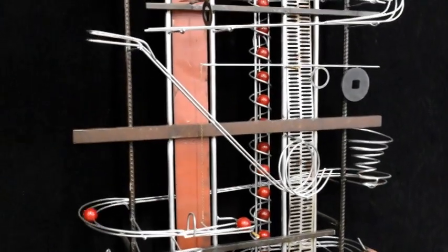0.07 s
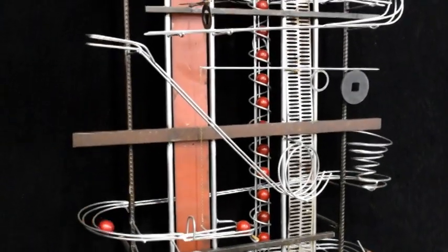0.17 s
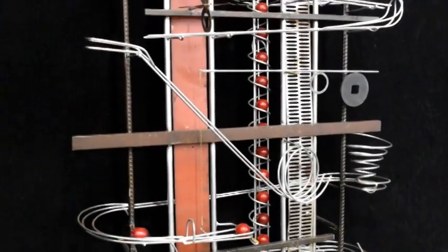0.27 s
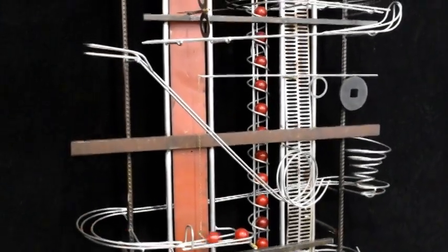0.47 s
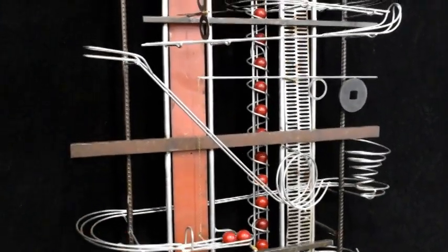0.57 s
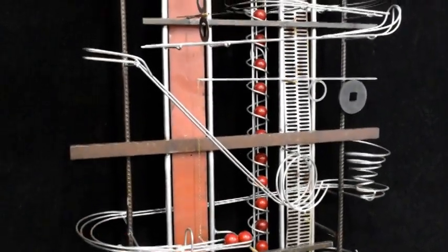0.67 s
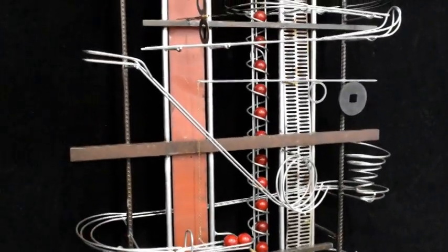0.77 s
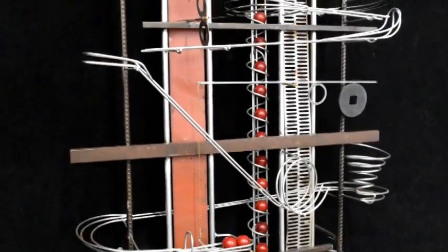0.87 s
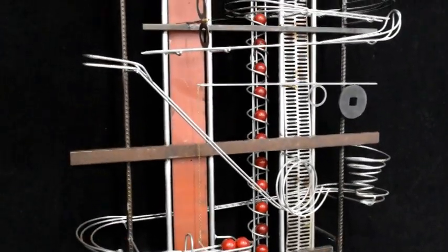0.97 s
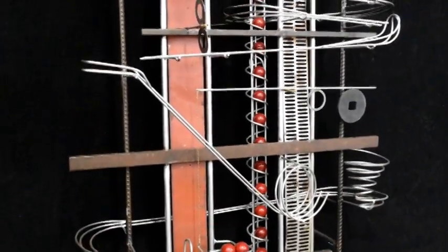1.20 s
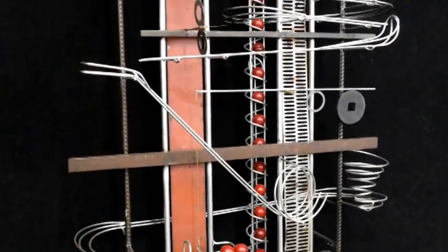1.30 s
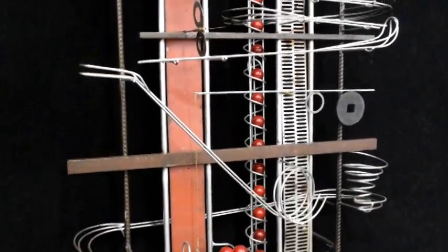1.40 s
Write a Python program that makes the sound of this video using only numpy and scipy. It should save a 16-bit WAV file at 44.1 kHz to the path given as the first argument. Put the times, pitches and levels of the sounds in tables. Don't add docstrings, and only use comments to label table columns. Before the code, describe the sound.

Small hard balls roll along steel wire tracks, hissing and ringing, with three sharp metallic clacks

```python
import sys
import numpy as np
from scipy import signal
from scipy.fft import rfft, irfft, next_fast_len
from scipy.io import wavfile
from scipy.ndimage import uniform_filter1d, map_coordinates

SR = 44100
rng = np.random.default_rng(int(sys.argv[2]) if len(sys.argv) > 2 else 0)


def volts(x):
    e = np.asarray(x, float) / 20
    return 10 ** e


def unload_wav(signal):
    wavfile.write(
        sys.argv[1],
        SR,
        np.round(np.clip(np.atleast_2d(signal).T, -1, 1) * 32767).astype(np.int16),
    )


N = 63945

# [t/s, level/dB]
ROLL_FORCE = [(0, -42), (.095, -42), (.105, -38), (.22, -40.5), (0.362, -41), (.415, -54), (0.431, -38.5),
              (.53, -41), (.56, -35), (.66, -36.5), (.78, -37), (.87, -37), (.915, -31.5), (1.05, -33.5),
              (1.22, -46.5), (1.26, -48), (1.45, -53)]
# [f/Hz, level/dB per Hz]
ROLL_COLOUR = [(300, -30.5), (700, -23), (1000, -13.5), (1300, -20.5), (2200, -7), (9000, -12),
               (12000, -20), (15500, -24.5)]
# [f/Hz, level/dB, t60/s]
FRAME_NOTES = [(893, -11, 0.77), (929, -6.5, 0.12), (1038, -7.5, 0.42), (1148.3, -8.5, 1),
               (1441, -11, 0.19), (1837.5, -7, 0.96), (1869, -8.5, 1), (1933, -23, 0.69),
               (2017, -16.5, 0.31), (2124, -7, 0.7), (2267, -10, 0.2), (2568, -6, 0.53), (2564, -30, 0.18)]
WIRE_NOTES = [(2660, 6.5, 0.12), (2756, 8, 0.42), (2860, 6, 0.83), (2880, -14, 0.39), (3385, -3, 0.95),
              (4510, -8, 0.15), (5660, -20, 0.56), (5410, 7, 0.1), (5080, 5, 0.39), (5945, 9, 0.16),
              (7650, 6.5, .4), (7846, -9, .3), (7600, -4, 0.57), (8300, -7, 0.17)]
FRAME_DB, WIRES_DB = -6, -8.5
LINGER_DB = 4
DULL_HZ, DULL_FROM_DB, DULL_RATE = 6000, -46.5, 1

# [f/Hz, level/dB per Hz]
RUMBLE_COLOUR = [(12, -42), (20, -15), (129, 1.5), (162, -6.5), (370, -8.5), (414, -10.5), (600, -7),
                 (780, -24), (1320, -120)]
# [f/Hz, level/dB per Hz]
ROOM_COLOUR = [(700, -6), (1200, -10), (3000, -12.5), (8000, -34), (16000, -56)]
# [f/Hz, level/dB, t60/s]
HUM_NOTES = [(101, -3.5, 0.29), (119.7, -5, 0.38), (162, -2, 0.18), (199.7, -3.5, 0.25)]
RUMBLE_DB, HUM_DB = -53, -62.5

# [t/s, level/dB, beat depth/0-1]
BAR_PATH = [(0, -53, .6), (0.239, -52, .5), (.265, -40, .3), (.31, -40.5, .3), (.335, -41.5, 0.98),
            (.45, -43.5, 1), (.53, -47.5, 1), (.62, -40.5, 0.8), (.74, -43, 0.74), (.86, -53.5, 0.94),
            (.95, -60, .5), (1.04, -40, .4), (1.11, -41.5, 0.8), (1.15, -55, 0.6), (1.3, -47.5, 0.7),
            (1.36, -56, .8), (1.45, -64, .8)]
BAR_HZ, BEAT_HZ, BEAT_PEAK_S = 1785.5, 26.2, .41

# [t/s, level/dB, share heard at once/0-1, hold/s, t60/s]
CLACKS = [
    (.2245, -29.5, 1, 0.035, 0.79),
    (.5675, -28, 0.94, 0.019, 0.26),
    (.9222, -19.5, 0.95, 0.018, 0.41),
]
# [f/Hz, level/dB, t60/s]
RING_1 = [(903, -14, 0.99), (954, -12, 0.51), (1039, -11, 0.37), (2135, -5.5, 0.9), (2210, -13, 0.24),
          (2813, -7, 1), (4620, -7, 0.2), (4710, -7, 0.17), (5445, -3, 0.1), (6100, -6, 0.41),
          (7610, -3, 0.38), (9230, -3, 0.63)]
RING_2 = [(989, -6, 0.25), (1422, -9, 0.15), (2640, -12, 0.38), (2840, -5, 0.21), (3440, -11, 0.33),
          (4770, -5, 0.12), (6000, -11, 0.36), (6300, -14, 0.28), (9200, -14, 0.15)]
RING_3 = [(573, -13, 0.31), (930, -5, 0.58), (1869, -5.5, 2), (1926, -8.5, 0.95), (2118, -4.5, 0.76),
          (2568, -5, 1.06), (2800, -2, 0.6), (3417, -7, 0.82), (5235, -6.5, 0.64), (5790, -2, 0.33),
          (7540, 1, 0.19), (7730, 1, 0.42), (8300, -2, 0.46), (8310, -3.5, 0.53)]
RING_DB = [-34, -32, -29]
# [f/Hz, level/dB per Hz]
RATTLE_1 = [(650, -24.5), (950, -11), (1300, -15.5), (2200, -8), (5430, -6), (10000, -7.5), (13800, -12.5),
            (16000, -10)]
RATTLE_2 = [(400, -32.5), (1010, -20), (2000, -15), (2750, -13), (4000, -9.5), (9000, -6), (13500, -7.5),
            (15500, -13)]
RATTLE_3 = [(200, -15), (300, -23.5), (520, -8), (760, -13), (1230, -9), (2500, -2), (7830, 1), (13800, 0),
            (16000, -4.5)]
# [f/Hz, share of its t60]
LASTS = [(300, 2.67), (2000, 1.9), (6000, 1.33), (15000, 0.82)]
RISE_S, RATTLE_SWAY_DB = 0.019, .5
# [f/Hz, level/dB per Hz]
TICK_COLOUR = [(1000, -30), (4500, -22), (6000, -6), (11000, 0), (13000, -5), (16000, -5)]
TICK_T60_S = .0032
# [t/s, peak level/dB]
TAPS = [
    (.2245, -23),
    (.4254, -27),
    (.5541, -8.5),
    (.5546, -10),
    (.561, -18),
    (.568, -28),
    (.5755, -21),
    (.9232, -11),
    (.9290, -13),
    (.9378, -11),
]

HIGH_HZ, MID_HZ = 5442, 2765
# [middle t/s, f/Hz, level/dB, half length/s]
SINGS = [(0.234, 2300, -41.5, 0.0074), (.237, 938, -39, 0.0047), (.238, HIGH_HZ, -35.5, 0.012),
         (0.249, 4250, -39, .006), (0.265, 2740, -38, .006), (0.275, 1008, -38, 0.0041),
         (0.313, 930, -46, 0.01), (0.341, 940, -40.5, 0.01), (0.357, HIGH_HZ, -39, 0.0076),
         (0.432, HIGH_HZ, -38.5, 0.0071), (0.463, 3980, -40, 0.0076), (.584, MID_HZ, -31.5, 0.0077),
         (.606, MID_HZ, -35.5, .009), (.626, MID_HZ, -35.5, 0.0082), (.586, 4800, -38, .004),
         (0.685, HIGH_HZ, -41, .01), (.722, HIGH_HZ, -41.5, .017), (0.786, 2747, -42, 0.014),
         (0.798, HIGH_HZ, -43, 0.008), (0.834, HIGH_HZ, -39.5, .012), (0.877, MID_HZ, -43, 0.011),
         (0.869, HIGH_HZ, -40, .012), (0.938, 7510, -25, 0.0059), (0.948, 5380, -30, 0.0053),
         (0.996, 8220, -29, 0.0091), (1.058, 2795, -38, 0.022), (0.966, 619, -45.5, .012),
         (1.004, 2800, -33, .012), (0.936, 2700, -29, 0.0034), (1.213, 7920, -50, 0.014),
         (1.187, 2078, -48.5, 0.057), (1.26, 1870, -50, .04), (1.296, 2730, -58, 0.015),
         (1.385, 1817, -56, 0.062), (1.44, 2810, -54, .02)]

# [t/s, lowest f/Hz, highest f/Hz, level/dB]
PUFFS = [
    (0.239, 9500, 11100, -42),
    (0.354, 7550, 9000, -40.5),
]
PUFF_S = 0.01

# [t/s, level/dB, length/s]
SCRAPES = [
    (0.332, -37, 0.031),
    (0.458, -43, 0.023),
    (0.561, -36, 0.006),
    (0.905, -34, 0.021),
    (.9245, -29, .002),
    (0.937, -25, 0.0089),
    (.975, -28, 0.022),
    (1.21, -50, 0.013),
]
# [f/Hz, level/dB per Hz]
SCRAPE_COLOUR = [(2000, -32), (6000, 4.5), (12000, -1), (16000, -3)]

TOP_HZ, BURST_TOP_HZ = 15400, 16400
BURST_JUMP_DB = 9


def unit(x):
    return x / np.sqrt(np.mean(x ** 2) + 1e-20)


def along(points, hz):
    f, v = np.transpose(points)
    return np.interp(np.log(hz + 1), np.log(f + 1), v)


def filtered(x, response):
    m = next_fast_len(len(x) + 2 * SR)
    spectrum = rfft(x, m) * response(np.fft.rfftfreq(m, 1 / SR))
    return irfft(spectrum, m)[:len(x)]


def wobble(rate, n):
    points = rng.standard_normal(int(n * rate / SR) + 4)
    return map_coordinates(points, [np.arange(n) * rate / SR])


def modes(table):
    def response(f):
        total = 0
        for k, (hz, db, t60) in enumerate(table):
            width = np.log(1000) / np.pi / np.clip(t60, .02, 3)
            peak = 1j * f * np.sqrt(width) / (hz * hz - f * f + 1j * f * width)
            total = total + (-1) ** k * volts(db) * peak
        return total
    return response


def mesh(n, colour, width_hz, depth_db, grit_db):
    grit = rng.standard_normal(n) * volts(grit_db * wobble(900, n))
    comb = rng.standard_normal(int(SR / 2 / 25) + 4)

    def response(f):
        place = np.minimum(f / max(width_hz, 25), len(comb) - 1)
        lines = map_coordinates(comb, [place])
        return volts(along(colour, f) + depth_db * lines)
    return unit(filtered(grit, response))


def rolling():
    s, db = np.transpose(ROLL_FORCE)
    t = np.arange(-SR // 2, N) / SR
    force_db = np.interp(t, s, db)
    force = volts(force_db + 0.54 * wobble(25.26, len(t)))
    hiss = mesh(len(t), ROLL_COLOUR, width_hz=40, depth_db=3.5, grit_db=1.0) * force
    treble = filtered(hiss, lambda f: 1 / (1 + (DULL_HZ / (f + 1)) ** 4))
    hiss = hiss - treble * (1 - volts(DULL_RATE * np.minimum(force_db - DULL_FROM_DB, 0)))
    push = force * np.where(t < 0, volts(LINGER_DB), 1)
    sing = 0
    for table, level in ((FRAME_NOTES, FRAME_DB), (WIRE_NOTES, WIRES_DB)):
        noise = rng.standard_normal(len(t))
        scale = volts(level) / np.std(filtered(noise, modes(table)))
        sing = sing + scale * filtered(noise * push, modes(table))
    return (hiss + sing)[-N:]


def bar():
    s, db, beat = np.transpose(BAR_PATH)
    t = np.arange(N) / SR
    depth = np.clip(np.interp(t, s, beat) + 0.059 * wobble(7.9, N), 0, 1.1)
    throb = 1 + depth * np.cos(2 * np.pi * BEAT_HZ * (t - BEAT_PEAK_S) + 0.47 * wobble(4.95, N))
    level = volts(np.interp(t, s, db) + 1.1 * wobble(14.2, N))
    note = np.sqrt(2) * np.sin(2 * np.pi * BAR_HZ * t + 0.39 * wobble(9.1, N))
    return level * throb * note


def rumble():
    colour = [(5, -30)] + RUMBLE_COLOUR[1:-2] + ROOM_COLOUR
    low = filtered(rng.standard_normal(N), lambda f: volts(along(colour, f)))
    hum = filtered(rng.standard_normal(N + SR), modes(HUM_NOTES))[SR:]
    return volts(RUMBLE_DB + 2.7 * wobble(5.5, N)) * unit(low) + volts(HUM_DB) * unit(hum)


def tick(db):
    t = np.arange(SR // 50) / SR
    noise = filtered(rng.standard_normal(len(t)), lambda f: volts(along(TICK_COLOUR, f)))
    click = volts(-60 * t / TICK_T60_S) * noise
    return volts(db) * click / np.abs(click).max()


def rattle(colour, hold, t60):
    noise = mesh(SR, colour, width_hz=35, depth_db=4.0, grit_db=1.5)
    hz, when, z = signal.stft(noise, SR, nperseg=256)
    lasts = along(LASTS, hz)[:, None]
    fade_db = -60 * np.maximum(when - hold * lasts ** 2, 0) / (t60 * lasts)
    return signal.istft(z * volts(fade_db), SR, nperseg=256)[1][:SR]


def ringing(table, hold):
    t = np.arange(SR) / SR
    total = 0
    for f, level, t60 in table:
        fade_db = -60 * np.maximum(t - hold, 0) / min(t60, 1.3)
        strength = volts(level + fade_db + 2.4 * wobble(33.2, SR))
        total = total + strength * np.sin(2 * np.pi * (f * t + rng.random()))
    return total


def clacks():
    out, t = np.zeros(N + SR), np.arange(SR) / SR
    colours, rings = (RATTLE_1, RATTLE_2, RATTLE_3), (RING_1, RING_2, RING_3)
    for (s, db, jump, hold, t60), colour, table, ring_db in zip(CLACKS, colours, rings, RING_DB):
        late = np.exp(-t / RISE_S)
        level = volts(db + RATTLE_SWAY_DB * wobble(52.3, SR))
        shake = level * rattle(colour, hold, t60) * (1 - (1 - jump) * late)
        ring = volts(ring_db) * ringing(table, hold) * (1 - late)
        start = round(s * SR)
        out[start:][:SR] += (shake + ring)[:len(out) - start]
    for s, db in TAPS:
        out[round(s * SR):][:SR // 50] += tick(db)
    return out[:N]


def singing():
    t = np.arange(N) / SR
    total = 0
    for s, hz, db, half in SINGS:
        swell = volts(db) * np.exp(-((t - s) / half) ** 4 / 2)
        rough = volts(2.5 * wobble(130, N)) * np.exp(.9j * wobble(150, N))
        total = total + swell * np.sqrt(2) * np.real(rough * np.exp(2j * np.pi * hz * t))
    return total


def puffs():
    t = np.arange(N) / SR
    total = 0
    for s, low, high, db in PUFFS:
        band = filtered(rng.standard_normal(N), lambda f: (f > low) * (f < high))
        total = total + volts(db) * np.exp(-((t - s) / PUFF_S) ** 2) * unit(band)
    return total


def scrapes():
    t = np.arange(N) / SR
    swell = sum(volts(db) * np.exp(-((t - s) / length) ** 2) for s, db, length in SCRAPES)
    return swell * mesh(N, SCRAPE_COLOUR, width_hz=60, depth_db=3, grit_db=1.5)


def scene():
    mono = rolling() + bar() + clacks() + scrapes() + rumble() + singing()
    return np.tile(mono, (2, 1))


def roll_off(x):
    return signal.sosfilt(signal.butter(12, 16500, fs=SR, output="sos"), x)


def record(dry):
    mono = dry[0]
    top = filtered(mono, lambda f: (f >= TOP_HZ) * (f < BURST_TOP_HZ))
    now = np.abs(uniform_filter1d(top ** 2, size=128))
    before = np.roll(np.abs(uniform_filter1d(top ** 2, size=512)), 400)
    burst = 1. * (now > before * volts(2 * BURST_JUMP_DB))
    gate = np.minimum(1, 4 * uniform_filter1d(burst, size=600))
    middle = filtered(mono, lambda f: f < TOP_HZ) + volts(-20) * gate * top
    mix = middle + np.array([[1], [-1]]) * puffs()
    return roll_off(mix)


dry = scene()
out = record(dry)
unload_wav(out)
```